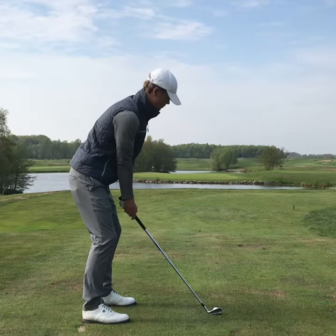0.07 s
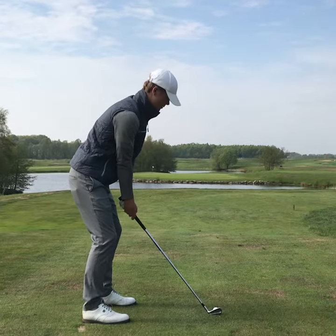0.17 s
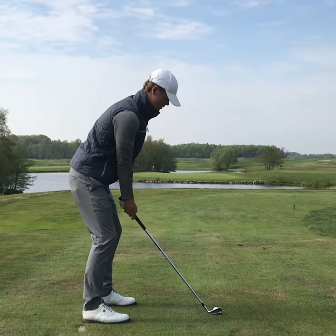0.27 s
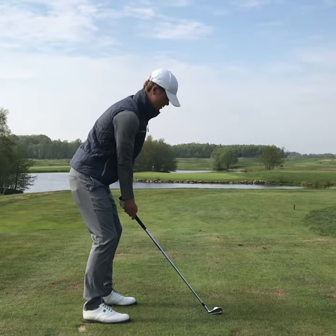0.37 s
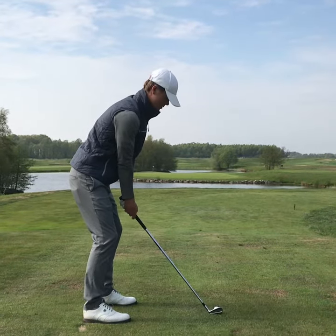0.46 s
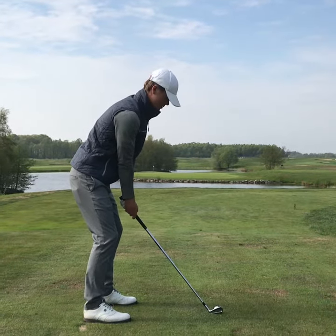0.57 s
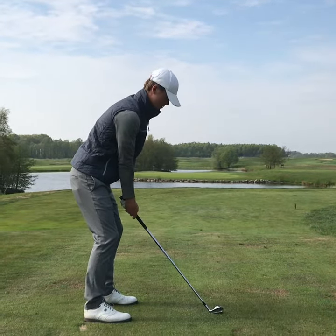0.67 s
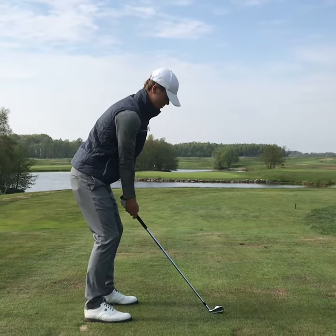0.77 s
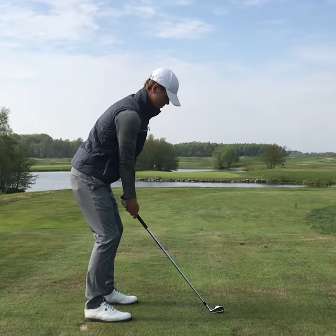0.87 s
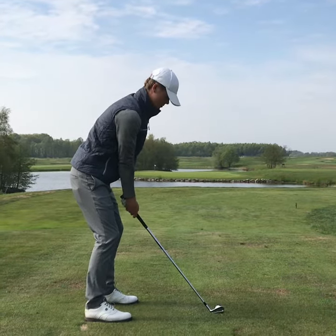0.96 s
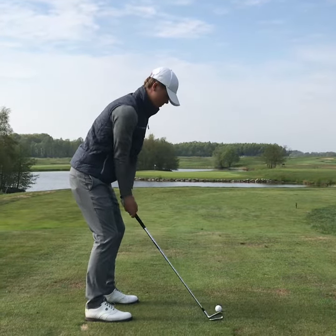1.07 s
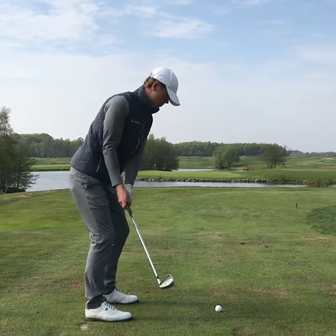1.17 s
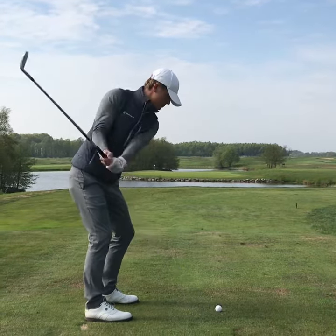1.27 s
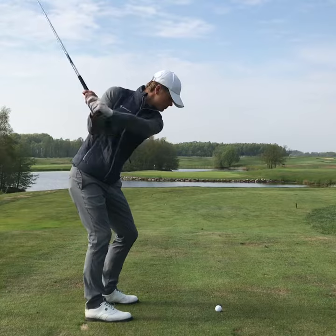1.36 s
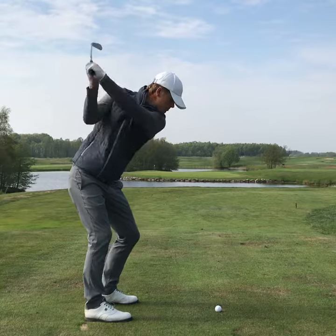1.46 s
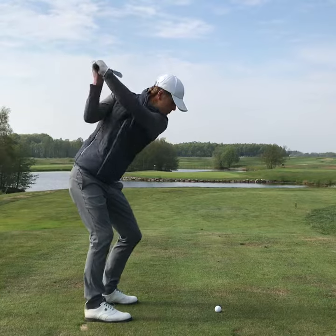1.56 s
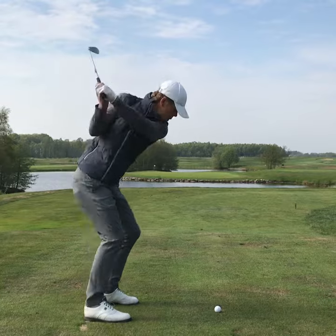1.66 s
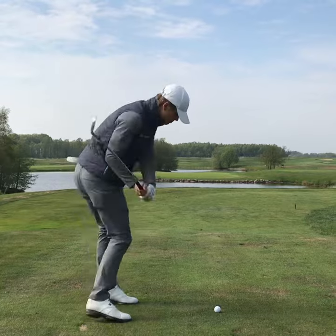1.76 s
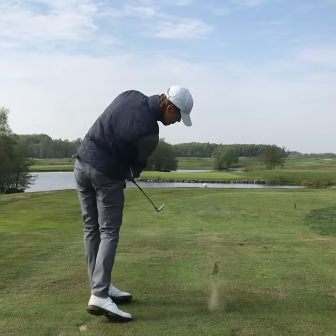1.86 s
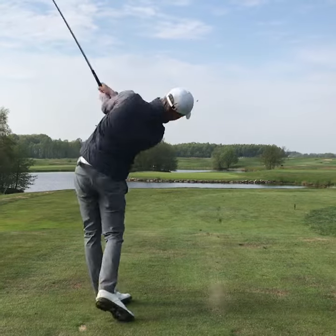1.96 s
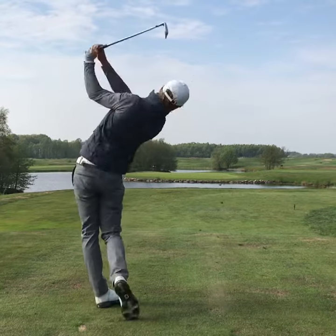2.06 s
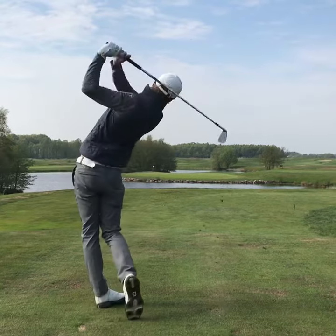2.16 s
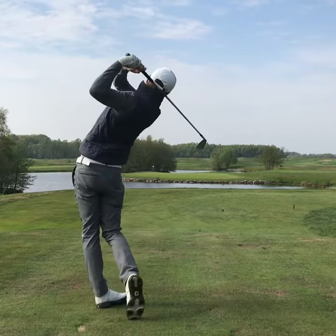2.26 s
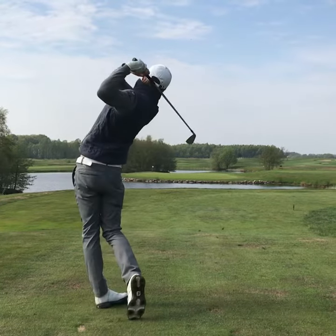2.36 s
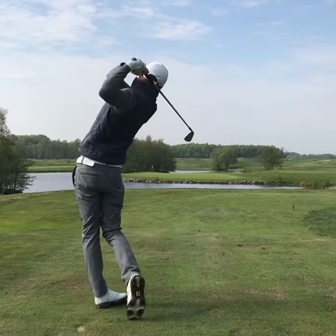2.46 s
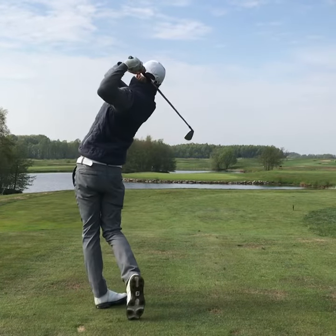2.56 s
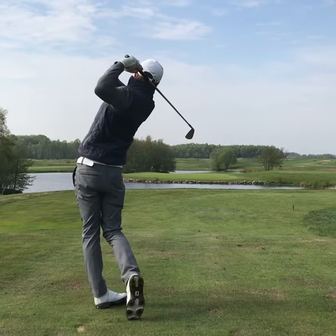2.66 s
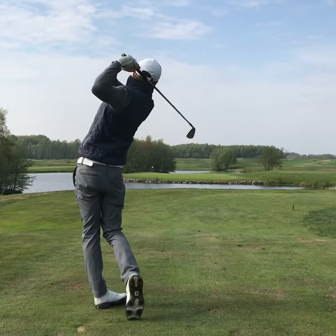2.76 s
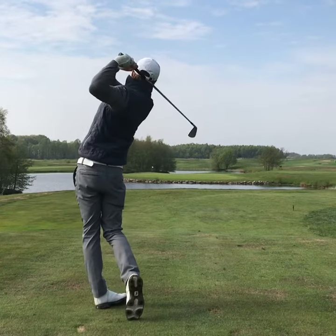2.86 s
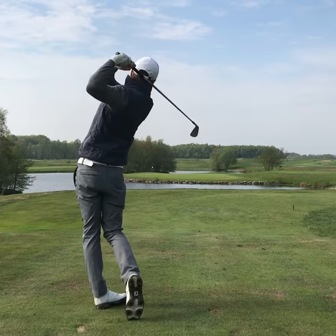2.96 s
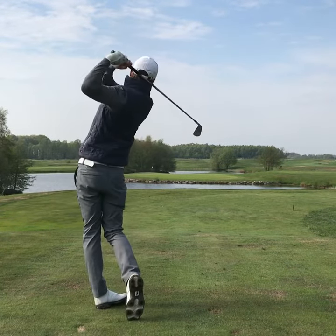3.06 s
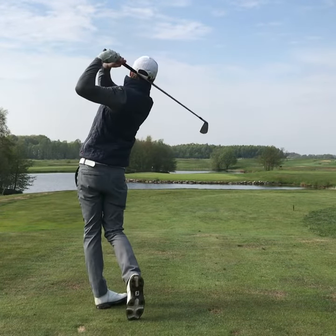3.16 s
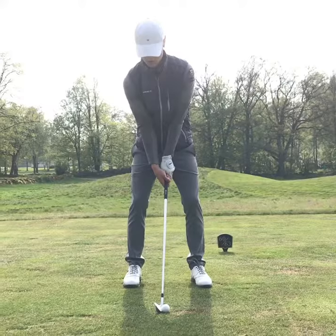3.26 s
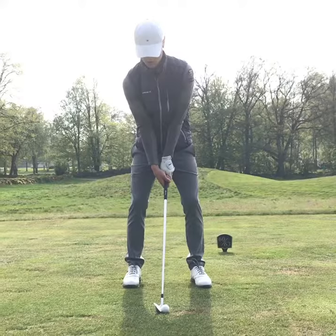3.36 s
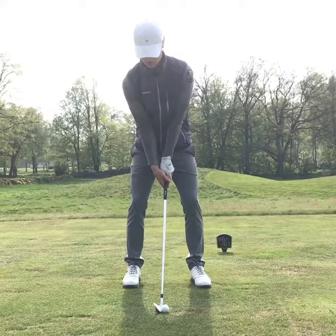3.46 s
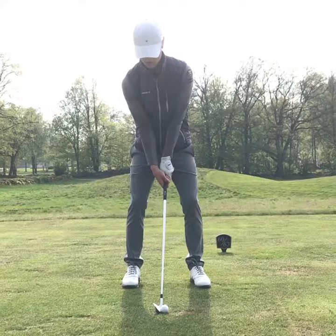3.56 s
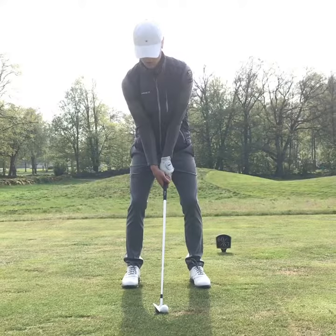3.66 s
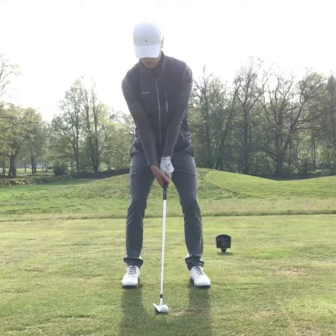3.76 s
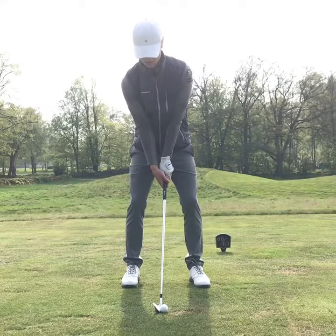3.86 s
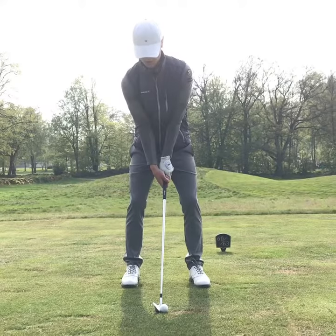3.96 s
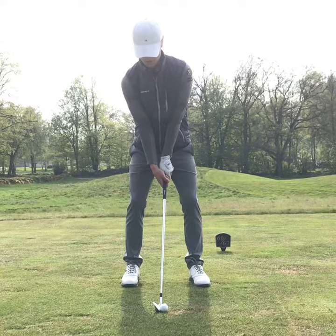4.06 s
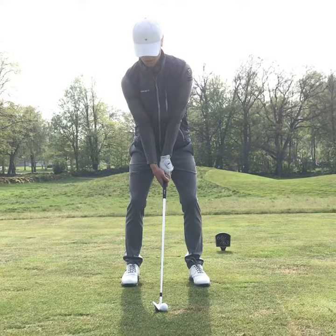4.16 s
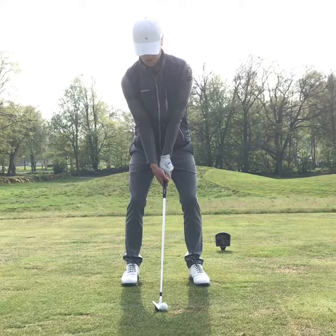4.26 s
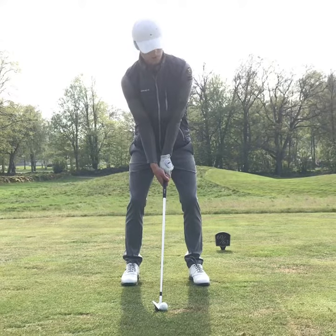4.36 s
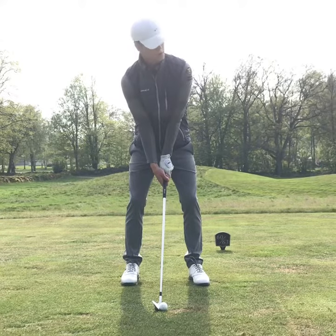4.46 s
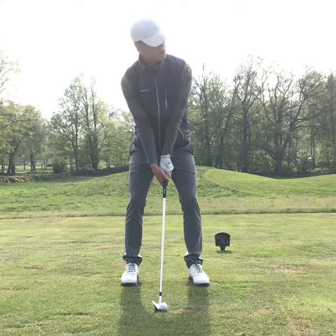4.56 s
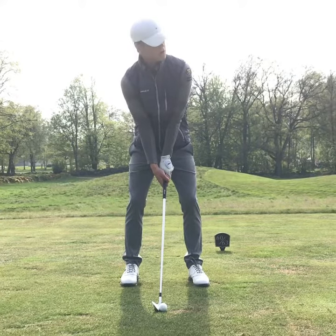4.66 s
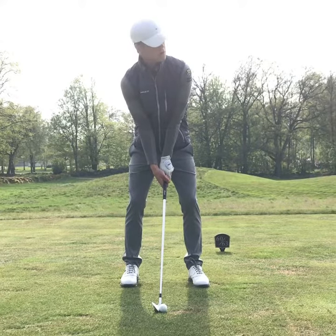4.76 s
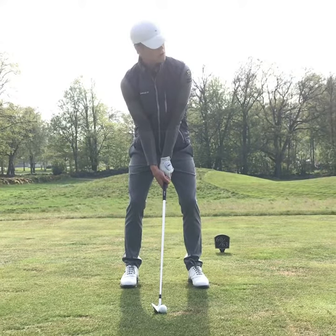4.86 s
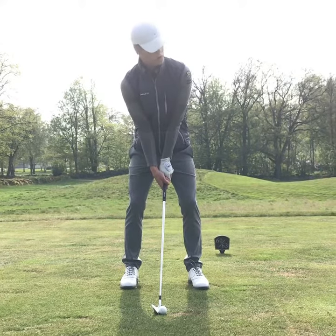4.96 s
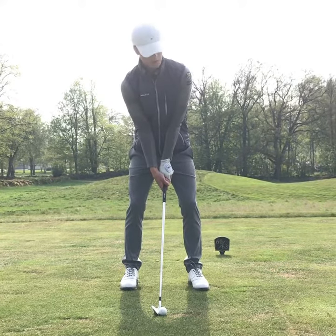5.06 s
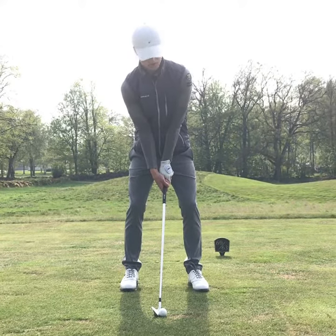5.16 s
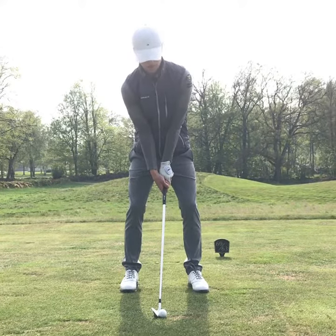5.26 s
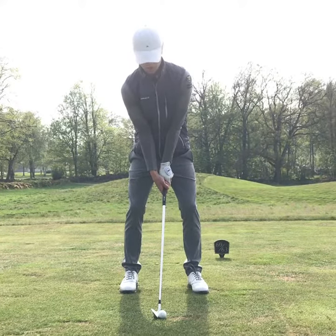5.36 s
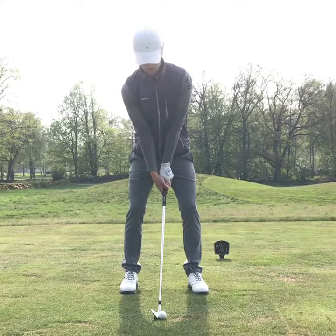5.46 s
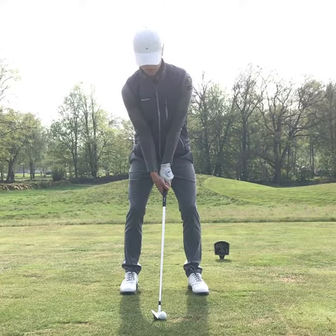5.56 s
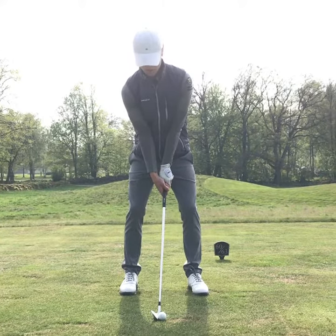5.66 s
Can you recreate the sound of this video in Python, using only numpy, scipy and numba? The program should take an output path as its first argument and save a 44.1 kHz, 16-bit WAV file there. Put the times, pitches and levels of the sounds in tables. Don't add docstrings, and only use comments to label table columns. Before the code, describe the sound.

A quiet golf course heard through a phone microphone. From 0 s a steady far road hum, faint hiss and low wind rumble lie under thin, distant bird whistles and chips. Soft jacket rustling starts near 1.1 s and swells through the backswing, with wind puffs and tiny zip ticks around 1.5 and 1.7 s. From 1.8 s a breathy swish rises swiftly, with a brief shaft whistle, into a very loud, dry steel crack at 1.93 s, immediately followed by a short turf thump and faint scatter from trees. Cloth rustles until about 2.35 s, then settles amid wind puffs. At 3.26 s sound dips briefly to silence and a slightly different road hum begins. A close finch gives two falling chirps at 3.3 s, a rapid eight-syllable trill from 3.4 to 4.2 s, then two flourishes, the second softer, until 4.5 s. Distant whistles continue; a faint tap comes at 5.3 s.

```python
import sys
import numpy as np
from scipy import signal
from scipy.fft import rfft, irfft
from scipy.io import wavfile
from scipy.ndimage import uniform_filter1d
from numba import njit

SR = 44100
rng = np.random.default_rng(int(sys.argv[2]) if len(sys.argv) > 2 else 0)


def store_wav(level_fs):
    pcm = np.round(np.clip(np.atleast_2d(level_fs), -1, 1) * 32767)
    wavfile.write(sys.argv[1], SR, pcm.T.astype(np.int16))


def how_loud(loudness_db):
    steps = np.asarray(loudness_db, float) / 20
    return 10 ** steps


N = 252252
T = np.arange(N) / SR
CUT_S = 3.259


def level(x, db):
    return x * how_loud(db) / np.sqrt(np.mean(x ** 2))


def curve(table):
    s, *columns = np.transpose(table)
    return [np.interp(T, s, column) for column in columns]


def inside(table):
    return (T >= table[0][0]) & (T <= table[-1][0])


def flicker(db, rate):
    coarse = np.repeat(rng.standard_normal(int(N / SR * rate) + 2), 4)
    wander_db = 1.2 * db * uniform_filter1d(coarse, size=5)
    return np.interp(T * rate * 4, np.arange(len(coarse)), how_loud(wander_db))


def colour(x, table, flicker_db, rate):
    octave = np.log2(np.arange(N // 2 + 1) * SR / N + 1)
    hz, db = np.transpose(table)
    shaped = rfft(x) * how_loud(np.interp(octave, np.log2(hz), db, left=-90, right=-90))
    lowest = np.floor(np.log2(hz[0]))
    highest = min(np.log2(hz[-1]) + 1, 15)
    out = 0
    for centre in np.arange(lowest, highest):
        band = irfft(shaped * np.clip(1 - abs(octave - centre), 0, 1), N)
        out = out + flicker(flicker_db, rate) * band
    return out


@njit
def svf(x, hz, sharp):
    y, b, l, k = np.empty(len(x)), 0., 0., 1 / sharp
    for i in range(len(x)):
        g = np.tan(np.pi * hz[i] / SR)
        v = (b + g * (x[i] - l)) / (1 + g * (g + k))
        b, l, y[i] = 2 * v - b, l + 2 * g * v, k * v
    return y


def puffs(table, overtone_db):
    out, t = np.zeros(N), np.arange(-.06 * SR, .06 * SR) / SR
    for s, db, hz, length, sign in table:
        i = int((s + t[0]) * SR)
        swings = np.cos(2 * np.pi * hz * t) + how_loud(overtone_db) * np.cos(2 * np.pi * 2.2 * hz * t)
        bell = np.exp(-(t / length) ** 2)
        out[i:i + len(t)] += np.sign(sign) * how_loud(db) * bell * swings
    return out


def trees(x, t60, gap_s, db, clump_db):
    t = np.arange(int(.6 * SR)) / SR
    bunches = flicker(clump_db, 150)[:len(t)]
    tail = rng.standard_normal(len(t)) * bunches * how_loud(-60 * t / t60) * (t > gap_s)
    return signal.fftconvolve(x, tail * how_loud(db) / np.sqrt(np.sum(tail ** 2)))[:N]


def air():
    # f/Hz, level/dB per
    # Hz
    first_road = [(65, -37), (110, -8), (134, -8), (155, -11.5), (192, -12.5), (226, -9.5), (413, -15),
                  (452, -14), (959, -2.5), (1200, -8.5), (1480, -11.5), (2550, -32), (4000, -38.5),
                  (5200, -66), (8800, -120)]
    second_road = [(65, -27), (110, 2), (140, -4.5), (275, -4.5), (395, -13), (611, -6), (800, -5),
                   (1070, -1), (1720, -12.5), (2290, -25), (2960, -31.5), (3190, -27.5), (4000, -37),
                   (5200, -64), (8800, -120)]
    # f/Hz, level/dB per Hz
    self_noise = [(2350, -37), (4000, -3), (4580, -5), (5960, -6), (7570, -10), (9130, -8), (10500, -10),
                  (13900, -5), (15300, -11.5), (16200, -17)]
    first = level(colour(rng.standard_normal(N), first_road, 1.0, 6), -49.5)
    second = level(colour(rng.standard_normal(N), second_road, 1.0, 6), -49)
    hiss = level(colour(rng.standard_normal(N), self_noise, 1.6, 22), -75)
    return np.where(T < CUT_S, first, second) * flicker(.6, 1.6) + hiss


def wind():
    # t/s, level/dB
    gusts = [(0.0, -56), (0.46, -53), (0.62, -56), (1.77, -50), (2.12, -52), (2.45, -50), (2.82, -57),
             (3.26, -51), (4.13, -54), (4.49, -51), (4.92, -54), (5.72, -55)]
    # t/s at the centre, peak level/dB, f/Hz, length/s, direction of the push [+1 or -1]
    single_puffs = [(1.132, -31.5, 58, 0.011, -1), (1.494, -36, 54, 0.02, -1), (1.540, -37, 56, 0.022, -1),
                    (1.782, -31, 72, 0.010, -1), (2.083, -36, 86.6, 0.0079, -1), (2.299, -41, 70, 0.019, 1),
                    (2.542, -29, 57.4, 0.017, 1), (3.036, -41, 65, 0.016, 1), (3.321, -39, 48.3, 0.017, -1),
                    (3.584, -38, 50.5, 0.02, -1), (4.577, -33, 60.5, .016, 1), (5.60, -42, 59.5, 0.012, 1)]
    port = [(20, -27.5), (35, -12), (50, 0), (70, -6.5), (110, -16.5)]  # f/Hz, level/dB per Hz
    rumble = colour(rng.standard_normal(N), port, 0.72, 9.1)
    return level(rumble, 2.5) * how_loud(curve(gusts)[0]) + puffs(single_puffs, -13)


def far_notes():
    # t/s, length/s, start f/Hz, level/dB
    slurs = [(.10, .05, 6600, -75), (.244, .08, 4100, -71), (.31, .075, 6600, -74), (.46, .06, 4040, -68),
             (.51, .07, 3640, -75), (.56, .051, 5800, -75), (.965, .04, 4600, -75),
             (3.30, .04, 7400, -69.5), (3.55, .025, 7400, -70), (3.675, .03, 6200, -66.5),
             (3.786, .052, 6230, -66.5), (4.483, .06, 3850, -65)]
    # t/s, centre f/Hz, sweep/Hz, level/dB
    chips = [(.208, 5450, 900, -74), (.51, 5350, 300, -75), (.627, 3930, 600, -72), (.645, 5130, 330, -72),
             (.675, 4850, -700, -68), (.755, 5430, -1100, -68), (.88, 4720, 440, -68),
             (1.05, 4250, 300, -66), (3.43, 5900, -600, -70), (3.688, 6800, -200, -68),
             (4.283, 4750, 450, -65)]
    # t/s, length/s, start f/Hz, level/dB
    held = [(.11, .05, 5250, -75), (.644, .03, 4450, -71), (1.207, .057, 4250, -70), (1.34, .04, 8860, -65),
            (2.40, .05, 3400, -69), (2.66, .025, 4000, -67.5), (3.61, .068, 6520, -66),
            (4.305, .03, 5110, -64), (4.337, .035, 5110, -65), (4.377, .05, 5050, -74.5),
            (4.483, .07, 3780, -65), (4.58, .06, 3620, -74), (4.79, .17, 4680, -76), (4.81, .14, 3200, -67),
            (5.04, .03, 3710, -65), (5.07, .02, 4500, -71), (5.213, .027, 3400, -67.5),
            (5.523, .06, 3270, -65), (5.585, .12, 3220, -67)]
    # t/s, length/s, start f/Hz, level/dB
    scoops = [(1.115, .05, 3800, -68), (1.148, .075, 4000, -60), (1.272, .07, 3900, -71),
              (2.592, .039, 3900, -66.5), (2.72, .025, 4000, -73.5), (3.265, .03, 3500, -66),
              (4.67, .04, 3580, -69), (4.73, .05, 4400, -75), (5.48, .036, 3000, -67)]
    chip_s = .017
    notes = [(s, chip_s, hz - sweep / 2, hz + sweep / 2, db) for s, hz, sweep, db in chips]
    for table, octaves_per_s in ((slurs, -2.6), (held, -.35), (scoops, 1.5)):
        for s, length, hz, db in table:
            notes.append((s, length, hz, hz * 2 ** (octaves_per_s * length), db))
    return notes


def add(out, s, shape, db):
    when, hz, rel_db = np.transpose(shape)
    t = np.arange(when[0], when[-1], 1 / SR)
    pitch = uniform_filter1d(np.interp(t, when, hz), size=45)
    loudness = np.sqrt(2) * how_loud(db + np.interp(t, when, rel_db))
    note = loudness * np.sin(2 * np.pi * np.cumsum(pitch) / SR)
    i = int((s + when[0]) * SR)
    out[i:i + len(note)] += note[:N - i]


def birds():
    # t/s from the syllable's time, f/Hz, level/dB
    drop = [(-.018, 5600, -30), (-.014, 6060, -19.5), (-.007, 6670, -22.5), (-.004, 5200, -17),
            (0, 4200, 0), (.005, 3650, 1.5), (.010, 3450, -1), (.014, 3450, -28.5)]
    vee = [(-.028, 5000, -30), (-.024, 4620, -7.5), (-.020, 3400, -14), (-.017, 4580, -22.5),
           (-.014, 5800, -15.5), (-.012, 6300, -36)]
    rise = [(-.008, 3260, -37), (-.004, 3980, -2.5), (0, 4410, -0.5), (.005, 4700, -5.5), (.007, 4750, -22)]
    fall = [(.008, 5380, -28), (.010, 4510, -3), (.013, 3550, -4), (0.021, 3075, -5), (.028, 2650, -7),
            (.031, 2450, -42)]
    soft_echo = [(.031, 2920, -23), (.037, 3110, -18), (.043, 3300, -18), (.048, 3370, -28.5)]
    tick = [(-.075, 4320, -24.5), (-.072, 4150, -5.5), (-.067, 3400, -21), (-.064, 3600, -14.5),
            (-.060, 4400, -1.5), (-.055, 3950, -9), (-.052, 3900, -30)]
    arch = [(-.045, 2164, -20), (-.032, 2350, -12), (-.019, 2680, -5), (-.008, 3120, -1.5), (0, 3570, -0.5),
            (.009, 3340, -5), (0.018, 2800, -5.5), (0.023, 2400, -10), (.024, 2300, -30)]
    # t/s, level/dB
    opening = [
        (3.303, -47.5),
        (3.358, -47),
    ]
    trill = [
        (3.442, -46.5),
        (3.545, -47.5),
        (3.643, -47.5),
        (3.736, -47.5),
        (3.831, -47),
        (3.927, -48),
        (4.022, -50),
        (4.121, -49.5),
    ]
    flourish = [
        (4.271, -49.5),
        (4.432, -52),
    ]
    near, far = np.zeros(N), np.zeros(N)
    for s, length, from_hz, to_hz, db in far_notes():
        glide = []
        for part, rel_db in ((0, -4), (.2, 0), (.8, -1.5), (1, -9)):
            glide.append((part * length, from_hz + part * (to_hz - from_hz), rel_db))
        add(far, s, glide, db - 7.5)
    song = ((opening, [drop]), (trill, [vee, rise, fall, soft_echo]), (flourish, [tick, arch]))
    for phrase, shapes in song:
        for s, db in phrase:
            for shape in shapes:
                add(near, s, shape, db + 0.5 * rng.standard_normal())
    waver = uniform_filter1d(uniform_filter1d(rng.standard_normal(N), size=130), size=130)
    paths = 0.93 + 0.48 * level(waver, 0)
    echo = how_loud(-20) * np.roll(near, int(0.022 * SR))
    return near * flicker(1.0, 250) + echo + far * paths + trees(near + far, .9, 0.019, -13.0, 4.0)


def moves():
    # t/s at the loudest point, level/dB, swell/s per 10 dB, fade/s per 10 dB
    rubs = [
        (1.09, -74, .05, .15),
        (1.28, -67, .05, .2),
        (1.37, -62, .1, .25),
        (1.77, -65, .05, .25),
        (1.905, -55, .07, .11),
        (2.04, -62, .1, .13),
        (2.165, -61, .15, .1),
        (2.334, -63, .45, .01),
        (2.45, -74.5, .15, .4),
        (3.33, -76, .04, .5),
    ]
    power = 0
    for s, db, swell, fade in rubs:
        tens_down = np.where(T < s, (s - T) / swell, (T - s) / fade)
        power = power + how_loud(db - 10 * tens_down) ** 2
    return np.sqrt(power)


def jacket():
    # f/Hz, level/dB per Hz
    cloth = [(1470, -32), (2500, -3.5), (3260, -2), (4190, -3), (5460, -5), (6590, -6.5), (8670, -6),
             (10500, -9.5), (12100, -7), (14900, -12), (16200, -20)]
    clicks = rng.standard_normal(N) * how_loud(2.0 * rng.exponential(size=N)) * flicker(0.99, 37)
    return level(colour(clicks, cloth, 1.5, 39), 0.98) * moves()


def swing():
    # t/s, f/Hz of the whirls, level/dB
    swish = [(1.80, 500, -65), (1.84, 702.5, -60), (1.87, 1100, -52.5), (1.90, 1600, -45.5),
             (1.925, 1500, -53.5), (1.945, 1300, -55.5), (1.99, 1100, -58), (2.04, 698, -72)]
    # t/s, f/Hz, level/dB
    whistle = [(1.86, 450, -66.5), (1.89, 540, -52), (1.905, 570, -45.5), (1.922, 560, -50),
               (1.93, 550, -74)]
    hz, db = curve(swish)
    low = svf(svf(rng.standard_normal(N), hz, .9), hz, .5)
    high = svf(svf(rng.standard_normal(N), 3.0 * hz, .8), 3.0 * hz, .6)
    head = (level(low, 0) + level(high, -9)) * how_loud(db) * flicker(1.5, 65)
    shaft_hz, shaft_db = curve(whistle)
    shaft = level(svf(rng.standard_normal(N), shaft_hz, 9.0), 0) * how_loud(shaft_db)
    return head * inside(swish) + shaft * inside(whistle)


def ring(modes, t):
    out = 0
    for k, (hz, db, t60) in enumerate(modes):
        out = out + (-1) ** k * how_loud(db - 60 * t / t60) * np.sin(2 * np.pi * hz * t)
    return out


def strike():
    # t/s, face level/dB, body level/dB, contact time/ms
    knocks = [
        (1.9275, -18.5, -13, .12),
        (1.9285, -8.5, -22.5, 0.01),
        (1.9288, 1, -17, 0.018),
        (1.9297, -11.5, -22.5, 0.033),
        (1.9312, -8, -2.5, .012),
    ]
    # f/Hz, level/dB, time to fade 60 dB/s
    face = [(2221, -5.5, 0.006), (2590, -15.5, .015), (3400, -5.5, 0.0073), (4320, -11.5, .012),
            (4660, -11, .012), (5120, -9.5, .011), (5600, -14.5, .008), (6075, -7.5, .011),
            (6770, -8, 0.0063), (8540, -9.5, 0.0079), (10820, -19, 0.013), (13400, -20, .006)]
    # f/Hz, level/dB, time to fade 60 dB/s
    body = [(230, -25.5, .05), (420, -30, .03), (998, -8.5, 0.022), (1206, -19, 0.02), (1575, -12.5, 0.022)]
    # t/s at the centre, peak level/dB, f/Hz, length/s, direction of the push [+1 or -1]
    thumps = [
        (1.9415, -24, 119, 0.0041, -1),
        (1.952, -29, 70, 0.011, 1),
        (5.311, -36.5, 1080, 0.0018, 1),
        (1.533, -64, 6700, .0006, 1),
        (1.677, -55, 5000, 0.00065, 1),
    ]
    t = np.arange(int(.1 * SR)) / SR
    out = np.zeros(N)
    for s, face_db, body_db, contact_ms in knocks:
        push = np.exp(-(1000 * t[:128] / contact_ms - 2) ** 2)
        crack_fade = how_loud(-15.5 - 60 * t / 0.0075) + how_loud(-24.5 - 60 * t / .026)
        crack = np.diff(rng.standard_normal(len(t) + 1)) * crack_fade
        knock = how_loud(face_db) * (how_loud(-3.5) * ring(face, t) + crack) + how_loud(body_db) * ring(body, t)
        i = int(s * SR)
        out[i:i + len(t)] += np.convolve(knock, push / push.sum())[:len(t)]
    out = signal.sosfilt(signal.butter(2, 200, "high", fs=SR, output="sos"), out)
    return out + puffs(thumps, -30) + trees(out, .2, .008, -40, 3.0)


def scene():
    fade_s = .024
    fade = np.clip(abs(T - CUT_S) / fade_s, 0, 1)
    return ((air() + wind() + birds() + jacket() + swing() + strike()) * fade)[None]


def band_limit(x):
    return signal.sosfilt(signal.butter(12, 16460, fs=SR, output="sos"), x)


def record(dry):
    dip = dry - 0.28 * signal.lfilter(*signal.iirpeak(10400, 6.0, fs=SR), dry)
    top_cut = signal.ellip(8, .2, 60, 16000, fs=SR, output="sos")
    mix = np.clip(signal.sosfilt(top_cut, dip), -1, 1)
    return band_limit(mix)


dry = scene()
out = record(dry)
store_wav(out)
```